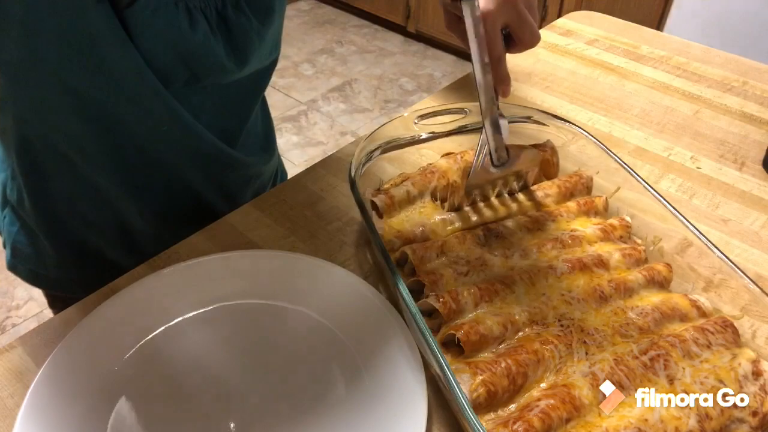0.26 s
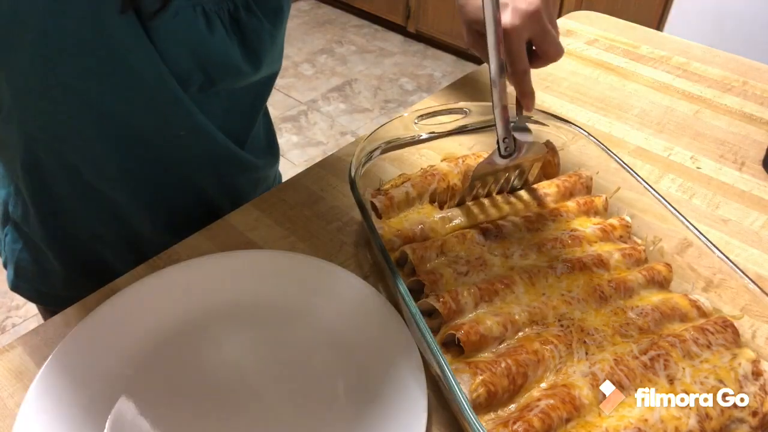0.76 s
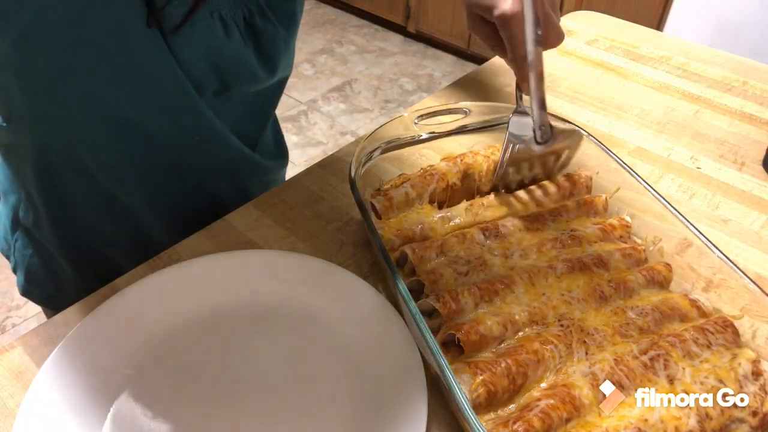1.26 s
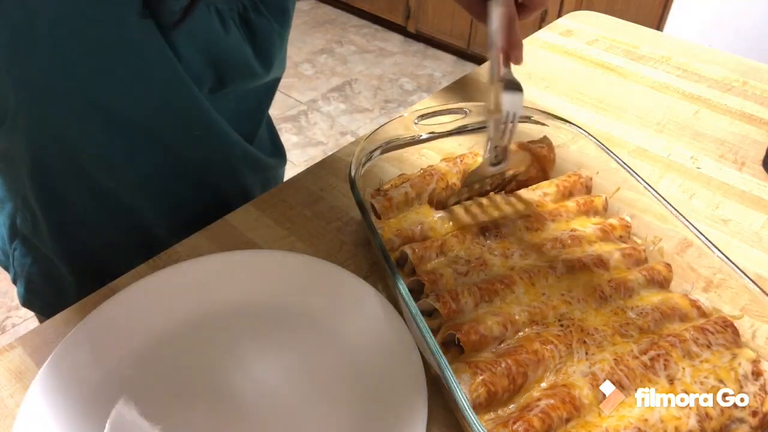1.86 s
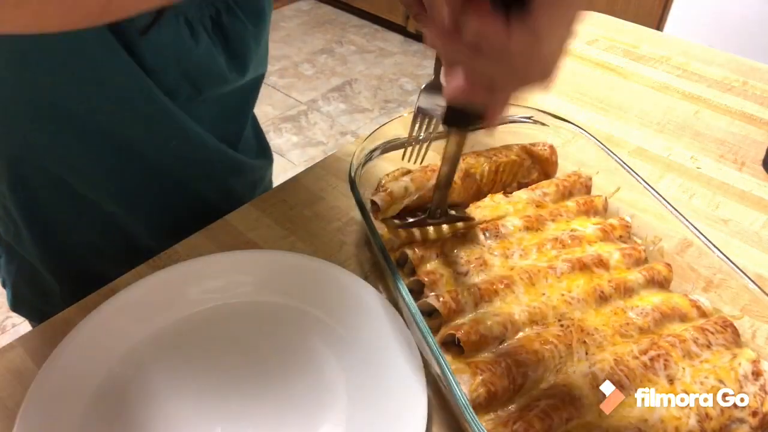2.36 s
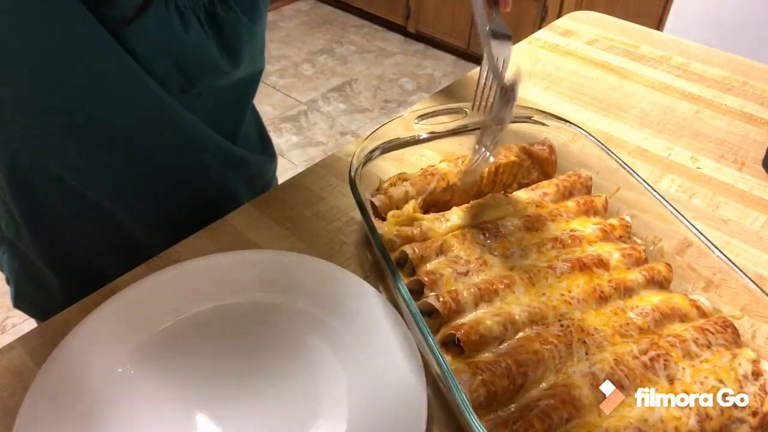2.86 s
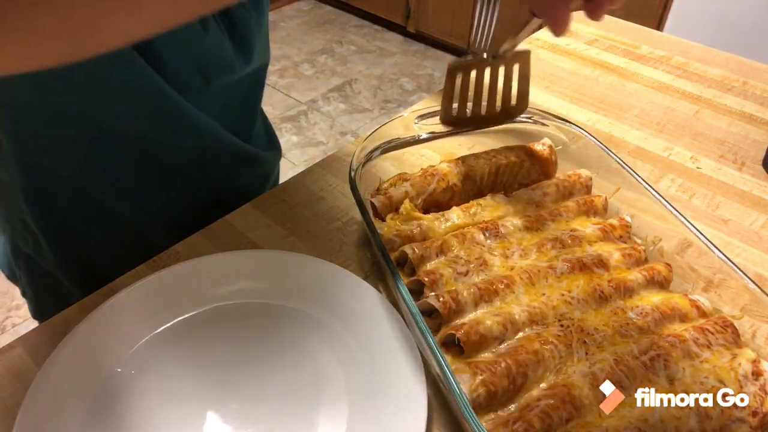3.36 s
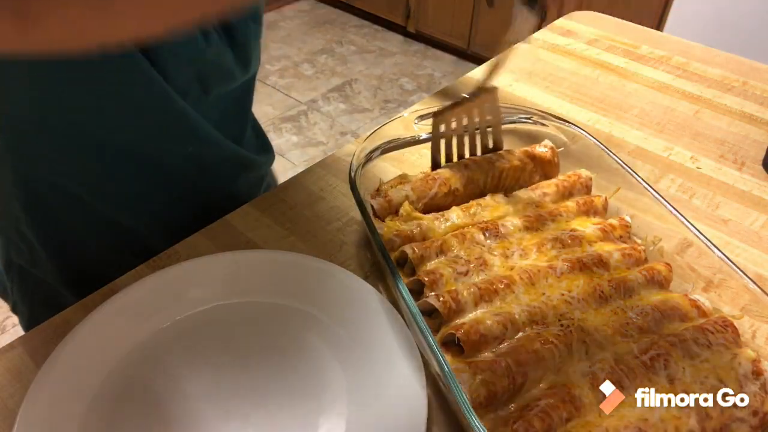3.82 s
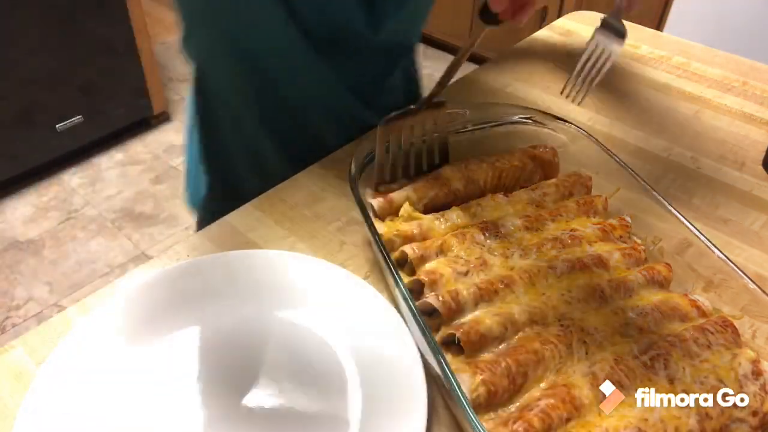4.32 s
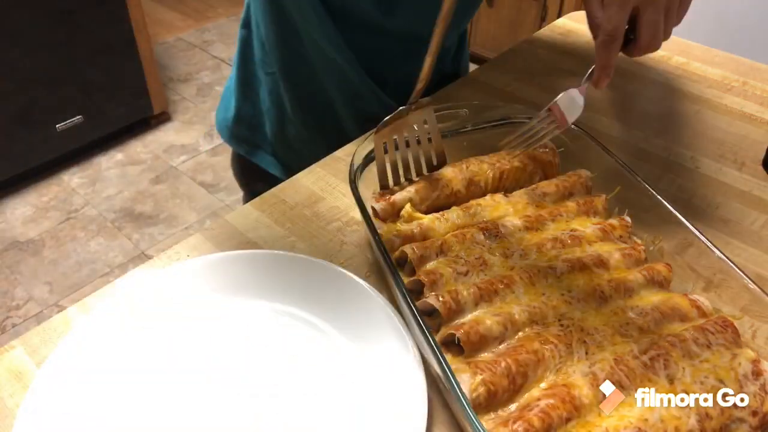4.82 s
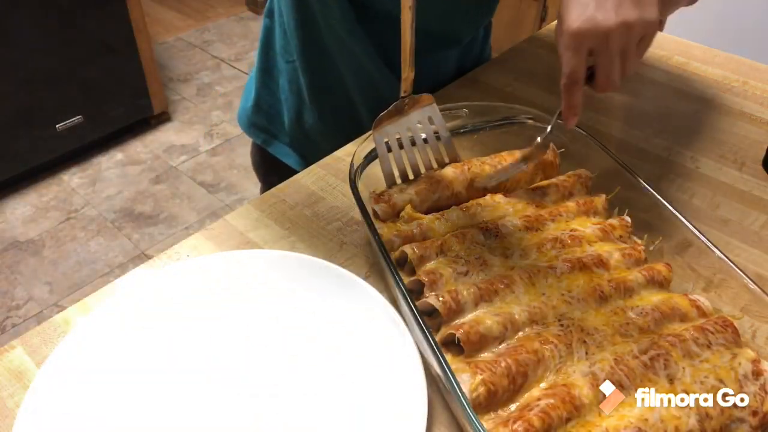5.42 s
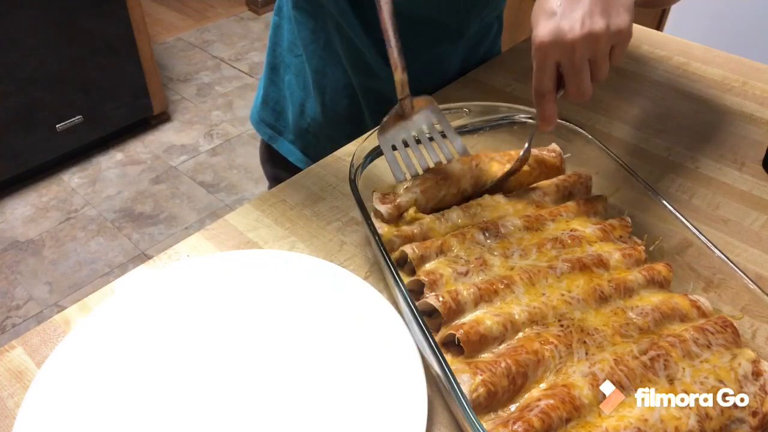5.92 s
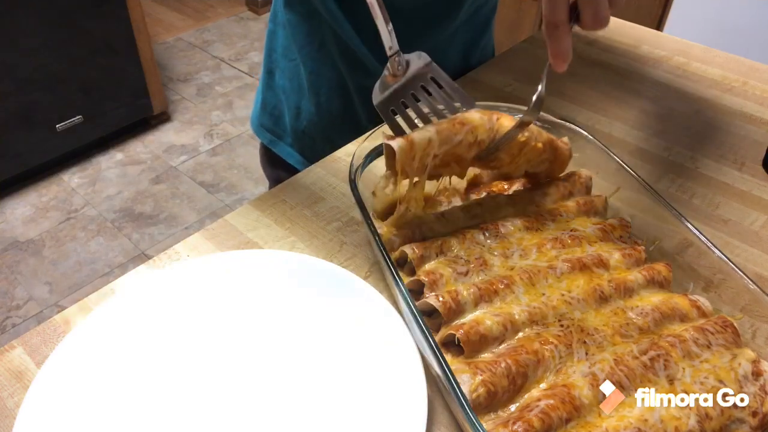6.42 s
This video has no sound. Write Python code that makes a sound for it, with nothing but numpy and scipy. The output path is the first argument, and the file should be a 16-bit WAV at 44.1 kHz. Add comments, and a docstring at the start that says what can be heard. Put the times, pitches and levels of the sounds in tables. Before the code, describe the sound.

In a humming kitchen, steel utensils clink together, scrape crust and glass, and bump a heavy dish on wood, ending with soft sticky ticks.

```python
"""A fridge hums over steady hiss: shaped noise with wavering sine tones. From 0.1 s sticky cheese and tines tick: noise puffs.
From 0.8 s a steel spatula and a fork clink (rattle, note and decaying modes), scrape glass and crust (friction noise through
resonances) and knock the dish on a wooden counter (low damped notes), which rumbles as the dish shifts (resonant noise).
From 2.4 s, mostly after 4 s, the spatula also clacks on the glass; the loudest ticks come near 6 s.
The sounds at the dish ring in the kitchen through decaying noise tails."""
import sys
import numpy as np
from scipy import signal
from scipy.fft import rfft, irfft, next_fast_len
from scipy.io import wavfile
from scipy.ndimage import uniform_filter1d, map_coordinates

SR = 44100
rng = np.random.default_rng(int(sys.argv[2]) if len(sys.argv) > 2 else 0)


def put_to_file(sound):
    """Save the sound as 16-bit audio at rate SR, in the file named by the first command-line argument."""
    columns = np.atleast_2d(sound).T  # one column per channel
    safe = np.clip(columns, -1, 1)
    whole_steps = np.round(safe * 32767)
    wavfile.write(sys.argv[1], SR, whole_steps.astype(np.int16))


N = 294715

# Spectrum of the fridge hum, before its overall level: pitch_hz, level_db (per Hz)
HUM_SPECTRUM = [(15, -52), (25, -34.5), (59, -5.5), (80, -11), (103, -11), (135, -8), (180, -5),
                (300, -9.5), (340, -14), (500, -14.5), (654, -25.5), (703, -20.5), (1050, -27),
                (2000, -42.5), (2600, -60), (4400, -120)]
# Spectrum of air and microphone hiss, before its overall level: pitch_hz, level_db (per Hz)
HISS_SPECTRUM = [(800, -12.5), (1500, 1.5), (3500, -4.5), (7700, -8), (8400, -14), (12000, -12.5),
                 (16000, -11)]
# The fridge's motor tones: one pitch_hz each, and one peak level_db each before it wavers
MOTOR_TONES_HZ = (120.4, 149.3, 468.6)
MOTOR_TONES_DB = (-57, -56, -65)
# Tines and sticky cheese tick: start_s, level_db (nominal peak), pitch_hz
CHEESE_TICKS = [(0.0952, -37, 15200), (0.1506, -48, 1580), (0.4768, -44, 15000), (0.4893, -43, 10600),
                (0.7854, -44, 7460), (0.84, -38, 14400), (0.9027, -42, 6900), (0.9268, -34, 4200),
                (0.9587, -39, 2710), (0.9842, -39, 15200), (1.049, -39, 12000), (1.6492, -33.5, 1680),
                (1.718, -37.5, 3180), (1.7749, -38, 3200), (1.808, -50, 3000), (1.8946, -38.5, 3740),
                (1.9154, -36, 1570), (1.9684, -35.5, 8460), (2.03, -48, 3800), (2.0921, -41, 2980),
                (2.1806, -43, 7700), (2.2977, -41, 12700), (2.3321, -37, 2100), (2.4536, -41, 13470),
                (2.5077, -41, 14630), (2.5324, -33.5, 12300), (2.5502, -39.5, 7340), (2.8848, -44, 3490),
                (3.0483, -41.5, 15330), (3.1602, -40.5, 14490), (3.1896, -44.5, 1444), (3.2301, -42, 15000),
                (3.448, -35, 13730), (3.7265, -37, 12500), (3.7544, -40, 13000), (3.956, -36, 4000),
                (4.242, -38, 10500), (4.8778, -37, 2490), (5.398, -47, 11040), (5.463, -37, 3500),
                (5.6371, -40, 15000), (5.6696, -42, 4130), (5.9855, -37, 2060), (6.018, -24, 1130),
                (6, -40, 7600), (6.005, -49, 4600), (6.0272, -23, 1790), (6.0621, -28.5, 1670),
                (6.2676, -47.5, 7500), (6.345, -44, 12500)]
# Reverberation of the kitchen: pitch_hz, t60_s
KITCHEN_DECAY = [(300, 1), (1500, 0.69), (4000, 0.55), (9000, 0.42), (15000, 0.77)]
# Steel drags over glass and crust: strongest_s, rise_s, fall_s, level_db, low_band_db, high_band_db (both over level_db)
SCRAPE_STROKES = [(0.836, 0.056, 0.079, -76.5, 19.5, 0), (1.56, .015, 0.11, -66.5, 4, -23),
                  (1.66, 0.26, .3, -73.5, 11.5, -14), (2.035, 0.18, 0.41, -75, 15.5, -13),
                  (2.362, 0.064, 0.24, -84, 6, -8), (2.538, 0.33, .15, -85, -11, 6),
                  (3.5, 0.02, 0.062, -72, 19.5, 10), (3.656, 0.022, 0.19, -65.5, 11, -5),
                  (3.81, 0.055, 0.082, -70, 13, -21), (3.94, 0.35, 0.13, -74, 10.5, -14),
                  (4.11, 0.0098, 0.15, -63, 13.5, 4), (4.24, 0.017, 0.049, -55.5, 8, -2),
                  (4.283, 0.01, 0.033, -61.5, 18.5, 21.5), (4.522, 0.31, 0.1, -56, 2, 2),
                  (5.22, 0.0091, 0.022, -72.5, 17.5, -11), (5.46, 0.16, 0.063, -77.5, 14, -2),
                  (5.662, 0.051, 0.12, -82, 14.5, 1), (5.908, 0.032, 0.041, -71.5, 8, -1),
                  (5.99, 0.038, 0.13, -79, 19.5, 13), (6.05, 0.18, 0.033, -85, 18, -5)]
# The dish shifts on the counter: strongest_s, rise_s, fall_s, rumble_db
DISH_SHIFTS = [(0.802, 0.018, 0.013, -40), (0.92, .03, 0.044, -55), (1.378, 0.011, 0.03, -32.5),
               (1.686, 0.12, 0.12, -53), (2.028, 0.13, 0.2, -48.5), (2.336, 0.061, 0.1, -53.5),
               (3.65, 0.038, 0.027, -53), (3.716, 0.053, 0.29, -55), (4.274, 0.66, 0.99, -55.5),
               (4.728, 0.023, .14, -42.5), (4.998, .035, 0.042, -38), (5.252, 0.2, 0.051, -65),
               (5.342, 0.024, 0.34, -50.5), (5.78, 0.29, 0.48, -50.5), (6.1, .15, 0.033, -58)]
# Fork and spatula touch: start_s, level_db (nominal peak), colour_1k_db, colour_7k_db, colour_12k_db, note_hz, note_db,
# ring_db, free_share (of the free ringing time), contact_t60_s
STEEL_CLINKS = [(0.7912, -28.5, -5, -4.5, -40, 3680, -8.5, -21.5, 0.18, 0.033),
                (1.3705, -15, -11.5, -2.5, -9, 3622, -1.5, -15, 0.41, .032),
                (1.5444, -44, -19, -6, -11, 3130, -10, -17, .95, 0.059),
                (3.478, -31, -4, -2, -3.5, 1077, -5.5, -21.5, 0.61, 0.067),
                (3.5292, -34.5, -48, -11, -15, 3090, -10, -21, .41, 0.013),
                (3.5778, -44, 2, -5, -18, 1455, -11, -15, .95, 0.036),
                (3.6544, -41.5, 10, -4, 2, 884, -1.5, -26, .82, .047),
                (3.7015, -39.5, -35, -2, -47, 4770, 1.5, -33, .8, 0.033),
                (3.7174, -42, -2, 15, -17, 880, -2, -32, .9, 0.02),
                (3.7947, -46, -17, -15, -42, 4250, -4, -37, .95, 0.16),
                (3.9075, -37, -6, -24, -31, 2620, 0.5, -41.5, .41, 0.023),
                (3.9377, -50.5, -18, -13, -22, 1144, -1.5, -34, 0.77, 0.046)]
# The spatula meets the dish: the same columns, the ring being that of the glass
GLASS_CLACKS = [(2.36, -39.5, 3.5, -14, -18, 1162, -16, -25, .56, 0.016),
                (4.0934, -26, 7, 0, -5.5, 900, -8, -31.5, 0.42, 0.066),
                (4.1353, -42.5, 6.5, -24, -4, 1370, -2, -11.5, 0.45, .026),
                (4.23, -45, -20, -1, -21, 1260, -7, -11, .7, .02),
                (4.2775, -25, 9, 6, -4, 4370, -6, -25.5, 0.77, 0.046),
                (4.6263, -25.5, -5, -1.5, -1.5, 2752, -7, -21, 1, 0.068),
                (4.7251, -20, -8, 2, -4, 7110, -13, -19.5, 0.57, 0.075),
                (4.733, -28.5, 2, -3, -8, 3545, 0, -18, 1, 0.039),
                (4.9398, -25, 6.5, -19, -28, 1194, -22, -20.5, 0.26, 0.014),
                (4.9885, -24.5, 7.5, -1, -6.5, 1234, -28, -26.5, 0.62, 0.027),
                (5.195, -37.5, 12.5, -1, -1.5, 1880, -2, -23.5, 0.3, 0.023),
                (5.3494, -41, 11, -4, -16, 1690, -7, -28.5, 0.54, 0.025),
                (5.3913, -50, 19, -35, -15, 1000, -6, -20.5, 1, .03),
                (5.6577, -54.5, 16, -23.5, -5, 1178, 0, -17, 0.54, .031),
                (5.8521, -52, 8, -15, -22.5, 1146, -1, -21, 0.64, .03),
                (5.9085, -41, 9, -8, -28, 1140, -7, -29, 0.37, 0.022),
                (5.968, -51.5, 15.5, -24, -4, 2065, 1, -17, 1, 0.017),
                (6.2045, -44, -1, -13, -27, 1657, -9.5, -26, 0.97, 0.016)]
# Where a contact's colour is set: pitch_hz; the second one is the 0 dB reference
COLOUR_POINTS_HZ = (1000, 3500, 7000, 12000)
# Modes of the steel tools: pitch_hz, level_db, t60_s (ringing freely)
STEEL_MODES = [(1010, 5, .06), (1265, 4, .25), (1480, 4, .32), (2050, -15, .2), (2541, -13, .3),
               (3230, -13, .6), (3400, -16, .5), (3612, 0, .14), (3978, -16, .1), (4482, -11, .6),
               (5283, -10, .5), (5333, -12, .45), (5415, -11, .65), (5771, -15, .2), (6562, -7, .18),
               (7267, -12, .38), (7620, -8, .2), (8540, -7, .25), (9324, -13, .28), (10170, -15, .22),
               (10920, -6, .15), (12420, -12, .2), (13860, -11, .22), (14980, -9, .15)]
# Modes of the glass dish: pitch_hz, level_db, t60_s (ringing freely)
GLASS_MODES = [(706, -8, .2), (920, -6, .15), (1196, -3, .2), (1405, -8, .2), (1920, -10, .12),
               (2690, -3, .15), (3327, -8, .2), (3780, -8, .15), (4360, -7, .25), (4920, -6, .3),
               (5252, -9, .2), (6358, -9, .12), (7100, -5, .3), (8032, -9, .15), (8866, -12, .17),
               (10060, -13, .2), (11110, -13, .16), (12200, -13, .18), (12540, -7, .15), (14220, -13, .15),
               (14950, -10, .13)]
# The dish knocks on the counter: start_s, level_db (nominal peak), pitch_hz
DISH_KNOCKS = [(0.793, -27.5, 499), (1.378, -27.5, 143), (3.723, -25.5, 126), (3.777, -28.5, 134),
               (4.284, -50, 142), (4.74, -30, 121), (4.774, -23.5, 124), (4.796, -47, 130),
               (4.99, -27.5, 353), (5.003, -26, 129), (5.351, -35, 364), (5.429, -29, 149),
               (5.459, -34.5, 152), (5.667, -34, 140), (5.727, -33, 177), (5.772, -48, 153)]

HUM_DB, HISS_DB = -56.5, -72.5
WAVERS_DB = 2.2  # how far a motor tone wavers
TICK_OCTAVES, TICK_CREST_DB, TICK_T60_S = 0.49, 17, .013  # spread, peak over rms, decay
GRIT_DB, GRIT_TOP_DB = 32, -50  # grit over its stroke and its ceiling, before a random drop
SWELL_DB = 20  # a stroke gains this over its rise and loses it over its fall
STROKE_STEP = 64  # samples between the points of a stroke's gain
CRUNCH_DB = 3.5  # how unevenly the crust gives way under the low band
NOTE_T60_S, KNOCK_T60_S = .038, 0.045
STEEL_ON_GLASS_DB = -18  # the spatula's ring under that of the dish it meets
CRACK_DB = -10.5  # first sharp instant of a contact
BETWEEN_MODES, MODE_WIDTH = 0.9, 0.038  # rattle gain away from the modes; mode width as a share of its pitch
TOP_HZ, EDGE_HZ = 15850, 16700


def amp(db):
    """Gain of a level in dB."""
    return 10 ** (np.asarray(db) / 20)


def unit(x):
    """x at rms 1."""
    return x / np.sqrt(np.mean(x ** 2) + 1e-20)


def along(points, hz):
    """(Hz, value) points read on a log axis."""
    f, v = np.transpose(points)
    return np.interp(np.log(hz + 1), np.log(f + 1), v)


def noise(size, response):
    """Noise of rms 1 with a gain for each frequency."""
    m = next_fast_len(size)
    spectrum = rfft(rng.standard_normal(m)) * response(np.fft.rfftfreq(m, 1 / SR))
    return unit(irfft(spectrum, m)[:size])


def wobble(rate):
    """A smooth random curve, rate knots a second."""
    knots = rng.standard_normal(int(N * rate / SR) + 4)
    return map_coordinates(knots, [np.arange(N) * rate / SR])


def add(track, s, sound):
    """Mixes a sound into the track from time s."""
    part = track[round(s * SR):][:len(sound)]
    part += sound[:len(part)]


def strokes(rows):
    """Gain of each stroke over time: it swells to its strongest moment and fades."""
    s, rise, fall, db = np.transpose(rows)[:4, :, None]
    t = np.arange(0, N, STROKE_STEP) / SR - s
    return amp(db - SWELL_DB * np.maximum(-t / np.abs(rise), t / np.abs(fall)))


def total(gains):
    """Overlapping strokes add in power; one value per sample."""
    power = np.sum(gains ** 2, axis=0)
    return np.interp(np.arange(N), np.arange(0, N, STROKE_STEP), np.sqrt(power))


def fridge():
    """Broad hum with wavering motor tones, over steady hiss."""
    hum = amp(HUM_DB + .6 * wobble(3)) * noise(N, lambda hz: amp(along(HUM_SPECTRUM, hz)))
    hiss = amp(HISS_DB) * noise(N, lambda hz: amp(along(HISS_SPECTRUM, hz)))
    out, t = hum + hiss, np.arange(N) / SR
    for hz, db in zip(MOTOR_TONES_HZ, MOTOR_TONES_DB):
        level = amp(db + WAVERS_DB * wobble(7))
        out += level * np.sin(2 * np.pi * hz * t + .7 * wobble(6))
    return out


def ticks(count=130):
    """Tiny contacts, each a puff of noise around its pitch; grit ticks at random, its level following the strokes."""
    out, t = np.zeros(N), np.arange(1024) / SR
    when, drop, height = rng.random((3, count))
    stroke_gain = total(strokes(SCRAPE_STROKES))[(when * N).astype(int)]
    stroke_db = 20 * np.log10(stroke_gain + 1e-9)
    grit_db = np.minimum(stroke_db + GRIT_DB, GRIT_TOP_DB) - 10 * drop
    grit = np.c_[when * N / SR, grit_db, 900 * 7 ** height]  # pitches from 900 to 6300 Hz
    for s, db, hz in [*CHEESE_TICKS, *grit]:
        puff = noise(len(t), lambda f: np.exp(-(np.log2((f + 1) / hz) / TICK_OCTAVES) ** 2))
        add(out, s, amp(db - TICK_CREST_DB - 60 * t / TICK_T60_S) * puff)
    return out


def kitchen(x):
    """Reverberation, each frequency dying at its own speed; a fresh noise tail serves each quarter second."""
    out, step = np.zeros(N), SR // 4
    for start in range(0, N, step):
        hz, t, z = signal.stft(rng.standard_normal(SR // 2), SR, nperseg=256)
        decay = amp(-60 * t / along(KITCHEN_DECAY, hz)[:, None])
        tail = signal.istft(z * decay, SR, nperseg=256)[1]
        wet = signal.fftconvolve(x[start:start + step], tail / np.linalg.norm(tail))
        add(out, start / SR + 0.0046, wet)  # delay in s
    return out


def scrapes():
    """Fine friction grains set the resonances of steel and glass going; three bands follow the stroke."""
    hz, db, _ = np.transpose(STEEL_MODES + GLASS_MODES)[:, :, None]
    grains = rng.standard_normal(N) * amp(.7 * wobble(40) + 2.2 * wobble(400))
    # The edge slides on, so other modes are fed
    z = signal.stft(grains, nperseg=512)[2]
    patches = uniform_filter1d(rng.standard_normal(z.shape), size=5, axis=0)
    patches = uniform_filter1d(patches, size=8, axis=1)
    grains = signal.istft(z * amp(2.6 * unit(patches)), nperseg=512)[1][:N]

    m = next_fast_len(N + 8192)
    f = np.fft.rfftfreq(m, 1 / SR)
    resonances = amp(db) / (1 + ((f - hz) / (.007 * hz)) ** 2)
    bodies = .55 + np.sqrt(np.sum(resonances, axis=0))
    driven = rfft(grains, m) * bodies

    def band(lo, hi):
        """The driven bodies between two soft edges in Hz, at rms 1."""
        edges = np.sqrt((1 + (lo / (f + 1)) ** 4) * (1 + (f / hi) ** 4))
        return unit(irfft(driven / edges, m)[:N])

    crunch = unit(band(600, 2600) * amp(CRUNCH_DB * wobble(90)))
    gains = strokes(SCRAPE_STROKES)
    low_db, high_db = np.transpose(SCRAPE_STROKES)[4:, :, None]
    out = total(gains) * band(2000, 8000)
    out += total(gains * amp(low_db)) * crunch
    return out + total(gains * amp(high_db)) * band(8000, 18000)


def counter():
    """The wood rumbles in its lowest resonances while the dish shifts."""
    resonances = [(72.4, 13, 0.28), (145, 25.1, 0.85), (310, 53, .5), (614, 810, 0.12)]  # pitch_hz, width_hz, gain
    rumble = noise(N, lambda f: sum(g / (1 + ((f - hz) / w) ** 2) for hz, w, g in resonances))
    return total(strokes(DISH_SHIFTS)) * unit(rumble * amp(3 * wobble(25)))


def ring(hz, db, t60, t, blur, early_db):
    """Decaying modes, each with two weaker neighbours that beat against it; an extra early part dies fast."""
    hz, db, t60 = (np.reshape(v, (-1, 1, 1)) for v in (hz, db, t60))
    near_hz = hz * (1 + blur * rng.standard_normal((len(hz), 3, 1)) * [[.15], [1], [1]])
    phase = 2 * np.pi * (near_hz * t + rng.random(near_hz.shape))
    partials = [[1], [.75], [.65]] * np.sin(np.float32(phase))
    cluster = np.sum(partials, axis=1, keepdims=True)
    fall = amp(-60 * t / np.clip(t60, .01, .9)) + amp(early_db - 60 * t / 0.011)
    return np.sum(amp(db) * fall * cluster, axis=(0, 1))


def favoured(modes, f):
    """Gain at frequencies f of a body that answers best at its modes."""
    hz, db, _ = np.transpose(modes)[:, :, None]
    peaks = amp(db) / (1 + ((f - hz) / (MODE_WIDTH * hz)) ** 4)
    return BETWEEN_MODES + np.sqrt(np.sum(peaks, axis=0))


def clinks():
    """Each contact is a short rattle, a note where the tool is held, and the ringing of steel and glass, damped by food."""
    out = np.zeros(N)
    steel, glass = (STEEL_MODES, 1.5, .007), (GLASS_MODES, 3, .022)  # modes, scatter in dB, blur
    contacts = [(row, [(*steel, 0)]) for row in STEEL_CLINKS]
    contacts += [(row, [(*steel, STEEL_ON_GLASS_DB), (*glass, 0)]) for row in GLASS_CLACKS]
    for (s, db, low_db, mid_db, high_db, note_hz, note_db, ring_db, free, t60), bodies in contacts:
        t = np.arange(SR * 2 // 5 if db > -28 else SR // 6) / SR  # loud contacts get longer to ring
        colour = list(zip(COLOUR_POINTS_HZ, (low_db, 0, mid_db, high_db)))
        rattle_colour = [(300, low_db - 26.0)] + colour
        rattle = noise(len(t), lambda hz: amp(along(rattle_colour, hz)) * favoured(bodies[-1][0], hz))
        dense = amp(-22.5 - 60 * t / (0.093 * free))  # the many weak modes merge into a dying hiss
        sound = .5 * rattle * (amp(-60 * t / np.clip(t60, .004, .2)) + dense)
        sound = sound + ring(note_hz, note_db, NOTE_T60_S, t, blur=0.008, early_db=-13.5)
        for modes, scatter_db, blur, body_db in bodies:
            hz, mode_db, mode_t60 = np.transpose(modes)
            spot_db = scatter_db * rng.standard_normal(len(hz))  # the spot that is hit varies
            struck_db = ring_db + body_db + mode_db + along(colour, hz) + spot_db
            sound = sound + ring(hz, struck_db, free * mode_t60, t, blur, early_db=6)
        onset = 1 - np.exp(-t / 0.0016)
        crack = amp(CRACK_DB - 60 * t / 0.007) * rattle
        add(out, s, amp(db) * (sound * onset + crack))
    return out


def knocks():
    """Wood answers with a low, quickly damped note and its blurred overtone."""
    out, t = np.zeros(N), np.arange(SR // 8) / SR
    for s, db, hz in DISH_KNOCKS:
        overtone = noise(len(t), lambda f: np.exp(-np.log((f + 1) / (2.45 * hz)) ** 2 / 0.11))
        wood = np.sin(2 * np.pi * hz * t) + 0.206 * overtone
        add(out, s, amp(db - 60 * t / KNOCK_T60_S) * wood * (1 - np.exp(-t / 0.004)))
    return out


def scene():
    """Everything at the dish rings in the room, over the hum."""
    near = ticks() + scrapes() + counter() + clinks() + knocks()
    return (fridge() + near + amp(-12) * kitchen(near))[None]


def record(dry):
    """The microphone falls off at the top of its band and keeps almost nothing above the edge."""
    m = next_fast_len(N + 8192)
    hz = np.fft.rfftfreq(m, 1 / SR)
    shelf_db = -22 / (1 + np.exp((TOP_HZ - hz) / 60))
    response = amp(shelf_db) / (1 + np.exp((hz - EDGE_HZ) / 20))
    return irfft(rfft(dry, m) * response, m)[:, :N]


dry = scene()
out = record(dry)
put_to_file(out)
```